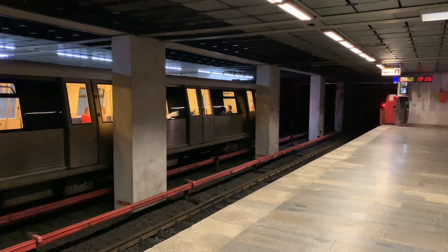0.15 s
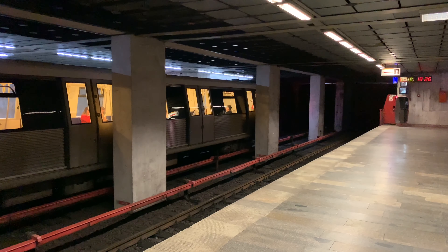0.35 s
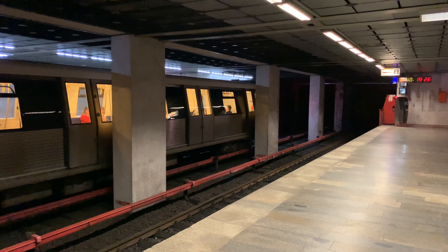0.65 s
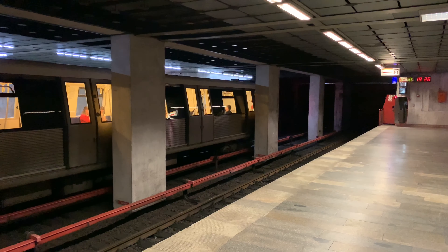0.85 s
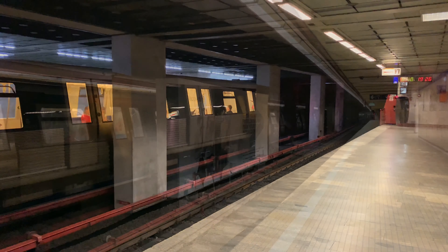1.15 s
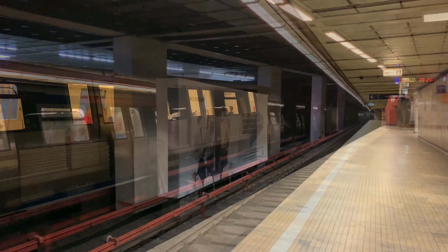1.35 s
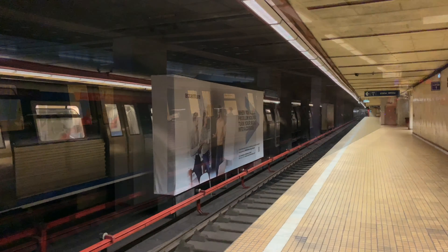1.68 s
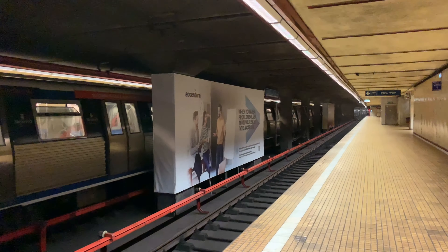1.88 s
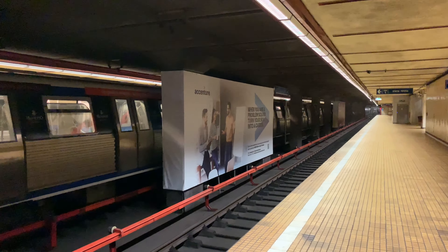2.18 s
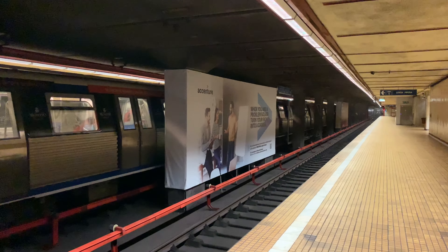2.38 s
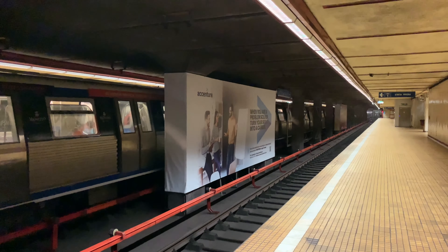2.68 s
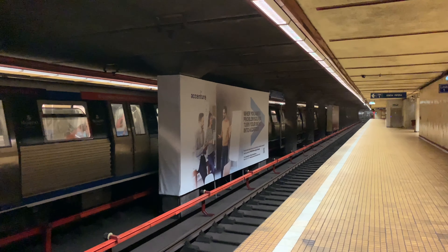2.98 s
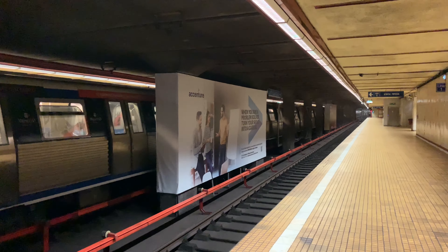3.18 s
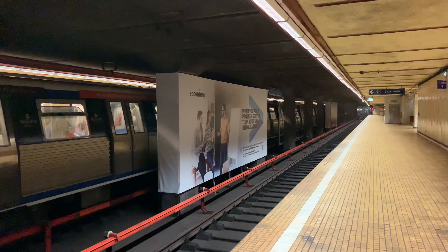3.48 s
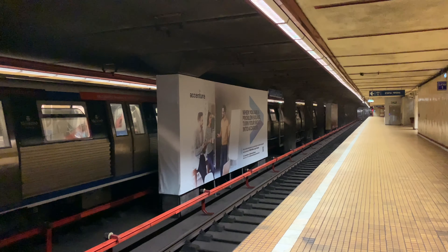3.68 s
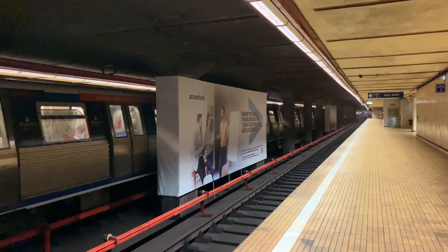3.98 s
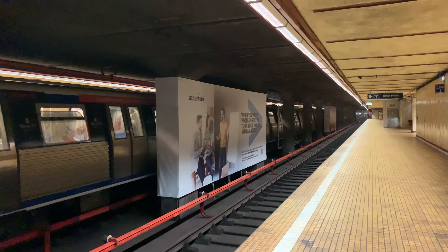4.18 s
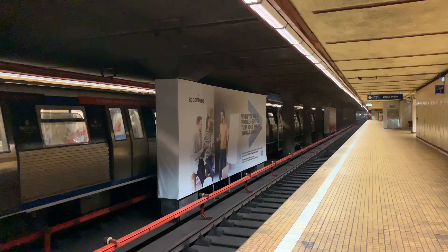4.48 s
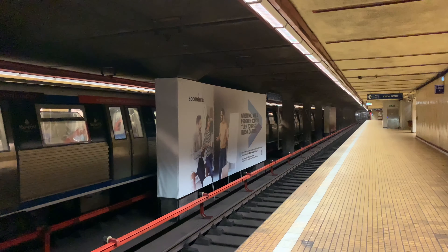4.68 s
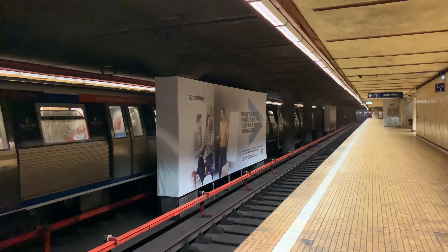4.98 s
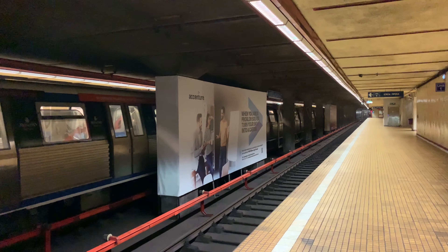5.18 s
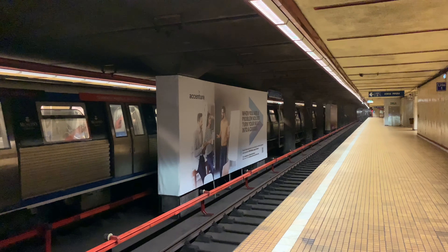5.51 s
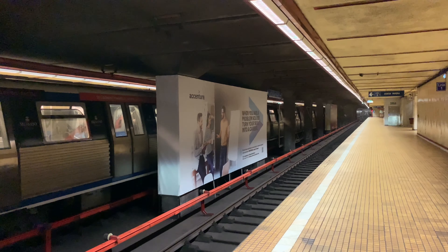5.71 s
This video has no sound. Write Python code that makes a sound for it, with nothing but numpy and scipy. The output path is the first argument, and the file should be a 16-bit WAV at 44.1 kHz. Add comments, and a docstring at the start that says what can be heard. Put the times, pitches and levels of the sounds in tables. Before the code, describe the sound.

Subway platform: deep fan and compressor hum blends into swelling wheel-on-rail rolling noise with wavering tonal singing and faint high air puffs.

```python
"""Two underground platforms, one fading into the other. At the first a standing train hums: its drone and fan
hiss are shaped noise lifted at duct resonances. At the second a train nears: rolling, roar and hiss are noise
shaped by ringing wheels; rail, track bed and wheels sing as noise-driven modes; converters whine as wavering
sines; an air valve puffs in decaying treble noise. Left and right are alike in part, by frequency."""
import sys
import numpy as np
from scipy import signal
from scipy.io import wavfile
from scipy.ndimage import uniform_filter1d

SR = 44100
rng = np.random.default_rng(int(sys.argv[2]) if len(sys.argv) > 2 else 0)


def waveform_to_disk(signal):
    """Save audio, clipped to [-1, 1], as 16-bit WAV at the path in sys.argv[1]."""
    frames = np.transpose(np.atleast_2d(signal))
    scaled = np.clip(frames, -1, 1) * 32767
    samples = np.round(scaled).astype(np.int16)
    wavfile.write(sys.argv[1], SR, samples)


N = 257984
SIZE, HOP = 2048, 512  # short-time spectra, samples
HZ = np.fft.rfftfreq(SIZE, 1 / SR)
TIMES = np.arange(N // HOP + 3) * HOP / SR


def gain_of(db):
    """Level: an amplitude ratio is ten to the power of dB / 20."""
    return 10 ** (np.asarray(db) / 20)


def evened(x):
    """Normalization: a signal divided by its root mean square has rms 1."""
    return x / np.sqrt(np.mean(x ** 2) + 1e-20)


def wander(t, top_hz):
    """Superposition: slow sines of random phase add up to a chance fluctuation of rms 1."""
    total = 0
    for f in np.geomspace(top_hz / 10, top_hz, 20):
        total = total + np.sin(2 * np.pi * (f * t + rng.random())) / np.sqrt(f)
    return evened(total)


def curves(table, t):
    """Linear interpolation: each column after the first becomes a curve over t."""
    s, *columns = np.transpose(table)
    return [np.interp(t, s, column) for column in columns]


def layer(shape_db, level_db):
    """Spectral power density: a shape of total power 1, scaled by a level curve over time."""
    power = gain_of(2 * shape_db)
    return power / power.sum(0) * gain_of(2 * level_db)


RING_SWAY, RING_SWAY_HZ = 0.17, 24  # uneven excitation: share of the lift, fastest rate
RING_DRIFT = 0.009  # pitch drift as a share of the resonance frequency


def spectrum(points, rings=()):
    """Resonance: Lorentzian peaks, swaying in strength and pitch, lift a broad spectrum."""
    f, db = np.transpose(points)
    shape = np.interp(np.log(HZ + 1), np.log(f), db, left=-120, right=-120)[:, None]
    for hz, width, lift in rings:
        swaying_lift = lift * (1 + RING_SWAY * wander(TIMES, RING_SWAY_HZ))
        centre_hz = hz * (1 + RING_DRIFT * wander(TIMES, RING_SWAY_HZ / 2))
        shape = shape + swaying_lift / (1 + (2 * (HZ[:, None] - centre_hz) / width) ** 2)
    return shape


def partly_alike(shared, own, like, turns):
    """Coherence: a phase-shifted share of common noise, filled up to full power by independent noise."""
    return like * shared * np.exp(2j * np.pi * turns) + np.sqrt(1 - like ** 2) * own


# the two ports above the bass: f/Hz, likeness (0-1, clipped), right port's lead/turns, left minus right/dB
PORTS_TREBLE = [(1743, 0.79, -0.75, -1), (2250, 0.21, -0.45, 0.5), (2900, 0.11, -0.98, 0),
                (4800, .2, -0.82, 0), (5500, 0.33, -0.46, -1), (6170, 0.26, -0.03, -0.5),
                (7160, 0.38, .5, 0), (8400, .32, 0.99, -2), (9500, 0.36, 0.78, -9), (10100, .4, 1.07, 1)]
# the stereo image at the top, where left and right turn in and out of phase: f/Hz, likeness (0-1), right
# channel's lead/turns, left minus right/dB
IMAGE_TOP = [(10750, .8, 1.47, 0), (10950, 1, 1.5, 0), (11750, 1, 1.5, 0), (12050, .7, 1.56, 0),
             (12400, .5, 1.72, 0), (12900, .8, 1.95, 0), (13300, 1, 2, 0), (14100, 1, 2, 0),
             (14500, .65, 2.05, 0), (15000, .5, 2.42, 0), (15300, 1, 2.5, 0)]


def in_stereo(power, bass_ports, patchy_db):
    """Interchannel coherence: Gaussian short-time spectra, partly shared by left and right."""
    like, turns, tilt_db = (c[:, None] for c in curves(bass_ports + PORTS_TREBLE + IMAGE_TOP, HZ))
    like = np.clip(like, 0, 1)
    a, b, c, d, patches = rng.standard_normal((len(TIMES), len(HZ), 5)).T
    patches = uniform_filter1d(patches, size=12, axis=0)  # over frequency
    patches = evened(uniform_filter1d(patches, size=5, axis=1))  # over time
    shared = a + 1j * b
    left = shared * gain_of(tilt_db / 2)
    right = partly_alike(shared, c + 1j * d, like, turns) / gain_of(tilt_db / 2)
    treble_share = np.clip(HZ[:, None] / 1500, 0, 1)  # the patches fade out toward the bass
    z = np.array([left, right]) * np.sqrt(power) * gain_of(patchy_db * patches * treble_share)
    return 1.34 * signal.istft(z, nperseg=SIZE, noverlap=SIZE - HOP)[1][:, :N]


CROSS_START_S, CROSS_END_S = 0.73, 1.74


def crossfade_db(t, incoming):
    """Equal-power crossfade: sine and cosine gains keep the summed power even."""
    turn = np.pi / 2 * np.clip((t - CROSS_START_S) / (CROSS_END_S - CROSS_START_S), 0, 1)
    return 20 * np.log10(np.maximum(np.sin(turn) if incoming else np.cos(turn), 1e-4))


# drone of compressors and fans, spectral shape: f/Hz, relative level/dB per Hz
DRONE = [(30, -14), (65, -3), (100, -4.5), (140, -1.5), (200, -1), (300, -6), (360, -10), (480, -13.5),
         (750, -13.5), (1000, -18.5), (1500, -24.5), (2500, -55)]
# the drone surges and settles: t/s, level/dB, brightness/dB per octave
DRONE_LEVEL = [(0, -19.5, -0.5), (.14, -22, 1), (.3, -20, 0), (.48, -21.5, 1), (.62, -20.5, -0.5),
               (.76, -24, 0.5), (.86, -19.5, -1), (1.0, -23, 1), (1.15, -23.5, 0.5), (1.4, -24.5, 0.5)]
# fan hiss, spectral shape: f/Hz, relative level/dB per Hz
FAN_HISS = [(900, -16), (1600, -0.5), (2400, -1), (3100, -7.5), (4100, -8.5), (5500, -14.5), (7200, -18),
            (8400, -17), (10700, -26), (12300, -19), (13400, -23.5), (15000, -23.5)]
# resonances of ducts and grilles: f/Hz, width/Hz, mean lift/dB
FAN_RINGS = [(606, 50, 5), (690, 50, 3.5), (1260, 77, 3.5), (1980, 90, 5.5), (2170, 100, 9),
             (2630, 76, 4.5), (2740, 73, 8.5), (3350, 170, 6), (3600, 100, 3.5), (4100, 110, 3),
             (11450, 150, 4.5)]
# bass at the two ports, first platform: f/Hz, likeness (0-1), right port's lead/turns, left minus right/dB
PORTS_FIRST = [(0, 0.93, 0.021, -1.5), (168, 0.98, 0.021, -1.5), (345, 0.95, 0.056, 0.5),
               (694, 0.62, 0.098, -1), (1030, 0.4, 0.17, -1), (1380, 0.16, 0.13, 3.5)]
FAN_HISS_DB, PATCHY_FIRST_DB = -37, 0.7


def standing_train():
    """Duct resonance: broadband drone and fan hiss are lifted where ducts and grilles ring."""
    fade_db = crossfade_db(TIMES, False)
    drone_db, bright_db = curves(DRONE_LEVEL, TIMES)
    drone_shape = spectrum(DRONE, FAN_RINGS) + bright_db * np.log2(HZ[:, None] + 1)
    power = layer(drone_shape, drone_db + fade_db)
    power = power + layer(spectrum(FAN_HISS, FAN_RINGS), FAN_HISS_DB + fade_db)
    return in_stereo(power, PORTS_FIRST, PATCHY_FIRST_DB)


# the train nears: t/s, rolling level/dB, rolling brightness/dB per octave, top air hiss level/dB,
# rumble level/dB, roar level/dB, roar brightness/dB per octave, wheel hiss level/dB
APPROACH = [(1.0, -25.5, -2, -61, -24, -34, 3, -48), (1.5, -24, 1, -59, -33, -34.5, 5, -44),
            (2.0, -22, 2, -54, -32, -29.5, 4.5, -41), (2.5, -19, 0.5, -52, -27.5, -28, 1, -39),
            (2.8, -19.5, -0.5, -59.5, -30, -27.5, 2.5, -38), (3.2, -17, 0, -60.5, -29.5, -26.5, 2, -36.5),
            (3.6, -15.5, -2, -56, -32, -25, 1.7, -36), (4.05, -13, 1, -55, -28.5, -25.5, 5, -32.5),
            (4.401, -15, 0.5, -53.5, -27.5, -24, -0.5, -34), (4.8, -12.5, 2, -53, -26, -24.5, 0.5, -32.5),
            (5.35, -13.5, 4.5, -48.5, -26.5, -24.5, 3, -31.5),
            (5.85, -13, 2.5, -48.5, -26, -24, 1.5, -33.5)]
# rumble, spectral shape: f/Hz, relative level/dB per Hz
RUMBLE = [(18, -46.5), (30, -34), (50, 3), (90, 4), (130, 3), (200, -1.5), (400, -32.5)]
# rolling, spectral shape: f/Hz, relative level/dB per Hz
ROLLING = [(70, -25), (140, -9.5), (220, -1), (275, -1), (340, -4.5), (440, -12.5), (600, -17.5),
           (900, -36.5)]
# roar, spectral shape: f/Hz, relative level/dB per Hz
ROAR = [(350, -8), (630, -5), (840, -6.5), (1050, -6.5), (1350, -12), (1550, -21.5), (2200, -27.5)]
# wheel hiss, spectral shape: f/Hz, relative level/dB per Hz
WHEEL_HISS = [(900, -14), (1600, 3.5), (2300, -7.5), (2800, -7.5), (4100, -13), (5500, -19.5),
              (7100, -26.5), (9000, -31)]
# top air hiss, spectral shape: f/Hz, relative level/dB per Hz
AIR = [(5000, -1), (7000, -2.5), (8400, -4), (10000, -3.5), (11400, -8), (13000, -10), (14000, -15.5),
       (15000, -20.5)]
# low boom of the tunnel air, spectral shape: f/Hz, relative level/dB per Hz
BOOM = [(20, -21.5), (35, -9), (50, -2.5), (65, 0), (85, -25.5)]
# course of the boom: t/s, level/dB
BOOM_LEVEL = [(1.3, -38), (2.1, -34.5), (3.0, -40), (3.9, -32), (4.6, -37), (5.2, -47), (5.85, -42)]
# resonances under the rolling: f/Hz, width/Hz, mean lift/dB
WHEEL_RINGS = [(200, 28, 1), (273.3, 9.2, 4.5), (624, 31, 2), (711, 71, 5), (829, 25, 11.5),
               (912, 16.2, 12), (1022, 41, 5), (2010, 63, 6), (2155, 62, 4.5), (2390, 190, 4.5),
               (2600, 150, 2), (2990, 140, 3.5), (3420, 160, 3), (4330, 150, 3), (8270, 400, 3.5),
               (13000, 150, 3)]
# bass at the two ports, second platform: f/Hz, likeness (0-1), right port's lead/turns, left minus right/dB
PORTS_SECOND = [(0, 1, 0.039, -3.5), (168, 0.93, 0.029, -2.5), (340, 0.89, -0.095, -1.5),
                (716, 0.35, -0.13, 1), (1030, 0.49, -0.18, 2.5), (1310, 0.16, -0.16, 0)]
TREBLE_SWELL_DB, SWELL_TOP_HZ = 0.6, 25  # hiss of wheels and air comes in gusts: rms depth, fastest rate
PATCHY_SECOND_DB = 1


def nearing_train():
    """Rolling noise: broadband excitation, coloured by ringing modes, grows on the whole as a train nears."""
    (rolling_db, bright_db, air_db, rumble_db,
     roar_db, roar_bright_db, hiss_db) = curves(APPROACH, TIMES)
    boom_db, = curves(BOOM_LEVEL, TIMES)
    octaves = np.log2(HZ[:, None] + 1)
    gust_db = TREBLE_SWELL_DB * wander(TIMES, SWELL_TOP_HZ)
    power = layer(spectrum(RUMBLE), rumble_db)
    power = power + layer(spectrum(ROLLING, WHEEL_RINGS) + bright_db * octaves, rolling_db)
    power += layer(spectrum(ROAR, WHEEL_RINGS) + roar_bright_db * octaves, roar_db)
    power += layer(spectrum(WHEEL_HISS, WHEEL_RINGS), hiss_db + gust_db)
    power += layer(spectrum(BOOM), boom_db)
    power += layer(spectrum(AIR, WHEEL_RINGS), air_db + gust_db)
    power *= gain_of(2 * crossfade_db(TIMES, True))
    return in_stereo(power + puffs(), PORTS_SECOND, PATCHY_SECOND_DB)


def sing(hz, db, width_hz, like, turns):
    """Lightly damped mode: twice low-passed complex noise modulates a carrier, as roughness shakes it."""
    a, b, c, d = rng.standard_normal((4, N))
    shared = a + 1j * b
    drive = np.array([shared, partly_alike(shared, c + 1j * d, like, turns)])
    r = np.exp(-np.pi * width_hz / SR)  # pole radius; width_hz is that of one stage
    slow = signal.lfilter([1], [1, -r], drive)
    slow = signal.lfilter([1], [1, -r], slow)
    carrier = np.exp(2j * np.pi * np.cumsum(hz) / SR)
    return gain_of(db) * evened((slow * carrier).real)


# the rail sings in swells: t/s, level/dB, f/Hz
RAIL_SONG = [(1.3, -45, 550), (1.7, -39, 552), (2.0, -27, 558), (2.35, -27, 554), (2.62, -35, 551),
             (2.78, -23, 540.5), (3.1, -22.5, 563), (3.28, -20, 541.3), (3.57, -25.5, 552),
             (3.68, -19, 542), (3.8, -22.5, 536.5), (4.051, -25.5, 534.6), (4.28, -18.5, 561),
             (4.552, -21, 528.8), (4.8, -18.5, 536), (4.95, -26, 523.4), (5.2, -17.5, 528.8),
             (5.372, -26.5, 560.2), (5.85, -27, 525)]
# the track bed hums: t/s, level/dB, f/Hz
TRACK_SONG = [(1.3, -31, 271), (1.8, -28, 269.6), (2.2, -25, 268), (2.7, -24.5, 274.2), (3.1, -26.5, 266.3),
              (3.6, -21.5, 267.8), (3.9, -22.5, 258), (4.3, -24, 267.8), (4.7, -19, 262),
              (4.85, -14.5, 267.6), (5.0, -19, 258.2), (5.12, -24, 298.2), (5.25, -17, 279.1),
              (5.4, -16, 262), (5.55, -21, 281.3), (5.7, -16.5, 290.5), (5.85, -27, 282)]
# the wheels sing: t/s, level/dB
WHEEL_SONG = [(1.3, -68), (1.62, -53), (2.05, -45), (2.2, -54), (2.4, -45), (2.7, -50.5), (3.1, -45),
              (3.45, -55), (3.72, -38.5), (3.85, -40), (4.15, -44), (4.5, -46), (4.7, -41), (5.0, -43),
              (5.4, -45), (5.85, -47)]
RAIL_WAVER_HZ, RAIL_FLUTTER_DB, RAIL_WIDTH_HZ = 6, 1.2, 52
TRACK_WIDTH_HZ = 62
WHEEL_SONG_HZ, WHEEL_WAVER_HZ, WHEEL_FLUTTER_DB, WHEEL_WIDTH_HZ = 2425, 30, 2.5, 260


def songs():
    """Modal vibration: rail, track bed and wheels each sing as a narrow band of changing pitch or level."""
    t, coarse = np.arange(N) / SR, np.arange(0, N, 64) / SR
    waver, flutter, broken = (np.interp(t, coarse, wander(coarse, top_hz)) for top_hz in (12, 9, 20))
    rail_db, rail_hz = curves(RAIL_SONG, t)
    rail = sing(rail_hz + RAIL_WAVER_HZ * waver, rail_db + RAIL_FLUTTER_DB * broken,
                RAIL_WIDTH_HZ, like=0.63, turns=-0.097)
    track_db, track_hz = curves(TRACK_SONG, t)
    track = sing(track_hz, track_db, TRACK_WIDTH_HZ, like=1.0, turns=-0.078)
    wheel_db, = curves(WHEEL_SONG, t)
    wheels = sing(WHEEL_SONG_HZ + WHEEL_WAVER_HZ * waver, wheel_db + WHEEL_FLUTTER_DB * flutter,
                  WHEEL_WIDTH_HZ, like=0.27, turns=0.1)
    return gain_of(crossfade_db(t, True)) * (rail + wheels + track)


# converter whine, before the offsets below: t/s, left level/dB, right level/dB, right port's lead/turns
WHINE = [(1.25, -65, -57, 0.039), (1.75, -63, -60, .02), (1.95, -67, -58, -.35), (2.15, -58, -51, -.2),
         (2.45, -65, -54, -0.29), (2.621, -59, -50, 0.03), (2.72, -61, -55, -.05), (2.81, -63, -67, -.3),
         (2.9, -60.5, -53, 0.02), (3.05, -61, -51, -0.29), (3.25, -60, -59, -0.41),
         (3.75, -63.5, -58, -.28), (4.1, -53, -51, -0.29), (4.25, -57, -58, -0.24), (4.5, -59, -54, -.46),
         (5.102, -67, -50, -0.26), (5.45, -63.5, -62, -0.27), (5.8, -59, -54, -0.39)]
# offsets for three ripple steps below the whine, the whine itself, three steps above: level/dB
SIDEBANDS_DB = [-20, -0.5, -15]
# multiple of the ripple frequency for each swell in the next table
RIPPLE_MULTIPLES = (24, 24, 24, 24, 48, 48, 49, 50, 50, 50, 50, 50, 51, 51, 51, 52, 52, 52, 103, 128)
# swells: peak level/dB, left minus right/dB, t of the peak/s, spread/s, right port's lead/turns
RIPPLE = [(-55, 0, 1.9, .35, 0), (-55, 0, 3.2, .4, 0), (-52.5, 0, 4.0, .35, 0), (-54, 0, 5.0, .5, .1),
          (-66, 2, 1.85, .35, .55), (-64, 3, 2.6, .35, .55), (-69, 2, 3.3, .4, .4), (-66.5, 0, 1.9, .42, 0),
          (-57.5, 0, 2.78, .24, .43), (-59, 1, 3.35, .35, .51), (-55.5, 1, 4.6, .85, .56),
          (-60, 0, 5.75, .2, .47), (-65, 0, 2.15, .2, .39), (-62.5, 4, 3.6, .7, .28), (-65, 2, 5.2, .8, .3),
          (-60, 1, 2.82, .25, .3), (-62, 5, 3.65, .25, .05), (-64, 3, 5.1, .15, .38), (-72, 0, 2.5, 1, .3),
          (-77.5, 0, 3.2, 1, .07)]
WHINE_HZ, BUZZ_HZ = 8002, 101.03  # converter switching and supply ripple
WHINE_FLICKER_DB, RIPPLE_FLICKER_DB = 1.8, 3  # rms
LEAD_WAVER = 0.035  # rms turns by which the ports drift apart


def whines():
    """Modulation sidebands: a converter tone and ripple multiples, each wavering by hall reflections."""
    t = np.arange(0, N, 64) / SR
    left_db, right_db, whine_lead = curves(WHINE, t)
    whine_db = np.array([left_db, right_db])
    tracks = []
    for k, offset_db in zip((-3, 0, 3), SIDEBANDS_DB):
        tracks.append((WHINE_HZ + k * BUZZ_HZ, whine_db + offset_db, whine_lead, WHINE_FLICKER_DB))
    for k, (db, tilt_db, best, spread, lead) in zip(RIPPLE_MULTIPLES, RIPPLE):
        swell_db = db - 9 * ((t - best) / spread) ** 4  # 9 dB down one spread away
        both_db = swell_db + [[tilt_db / 2], [-tilt_db / 2]]
        tracks.append((k * BUZZ_HZ, both_db, lead, RIPPLE_FLICKER_DB))
    out, fine = np.zeros((2, N)), np.arange(N) / SR
    for hz, db, lead, flicker_db in tracks:
        drift = 0.19 * wander(t, 11.0)  # turns, common to both ports
        for port in (0, 1):
            phase = drift + port * (lead + LEAD_WAVER * wander(t, 6))
            turns = hz * fine + np.interp(fine, t, phase)
            level = np.interp(fine, t, gain_of(db[port] + flicker_db * wander(t, 20)))
            out[port] += np.sqrt(2) * level * np.sin(2 * np.pi * turns)
    return out * np.clip((fine - 1.15) / 0.35, 0, 1)  # fades in from 1.15 s to 1.5 s


# air valve puffs: t/s, level/dB, rise/s, 60 dB decay/s, centre f/Hz, distance to 12 dB down/Hz
PUFFS = [(1.565, -51, 0.03, 0.41, 13900, 1500), (3.0, -62, .02, 0.45, 8700, 800),
         (3.265, -55, 0.09, 0.69, 13500, 1100), (3.645, -50.5, .06, 0.68, 13700, 1100),
         (5.04, -52, 0.096, 0.96, 13600, 910.8)]
# resonances of the valve: f/Hz, width/Hz, mean lift/dB
VALVE_RINGS = [(12700, 250, 7.5), (13400, 250, -1), (13900, 250, -1), (14350, 250, 1)]
PUFF_RISE_POWER, PUFF_SPUTTER_DB = 1.6, 3  # exponent of the amplitude rise; rms depth


def puffs():
    """Exponential decay: sputtering bursts of treble air noise rise fast and die in the hall."""
    power = 0
    rings_db = spectrum([(1, 0), (SR, 0)], VALVE_RINGS)  # flat but for the resonances
    for s, db, rise, t60, hz, width in PUFFS:
        t = TIMES - s
        rise_db = PUFF_RISE_POWER * 20 * np.log10(np.clip(t / rise, 1e-4, 1))
        decay_db = -60 * np.maximum(t - rise, 0) / t60
        sputter_db = PUFF_SPUTTER_DB * wander(TIMES, 25)
        band_db = rings_db - 12 * ((HZ[:, None] - hz) / width) ** 2
        power = power + layer(band_db, db + rise_db + decay_db + sputter_db)
    return power


def scene():
    """Superposition: the sound pressures of both platforms and the tones add."""
    return standing_train() + nearing_train() + songs() + whines()


EDGE_HZ = 15150  # upper band limit


def record(dry):
    """Saturation and band-limiting: peaks bend softly, then a linear-phase low-pass cuts the top."""
    soft = 1.3 * np.tanh(dry / 1.3)
    padded = np.pad(soft, [(0, 0), (255, 255)], "reflect", reflect_type="odd")
    low_pass = signal.firwin(511, EDGE_HZ, window=("kaiser", 9), fs=SR)
    return signal.oaconvolve(padded, low_pass[None], "valid", axes=1)


dry = scene()
out = record(dry)
waveform_to_disk(out)
```